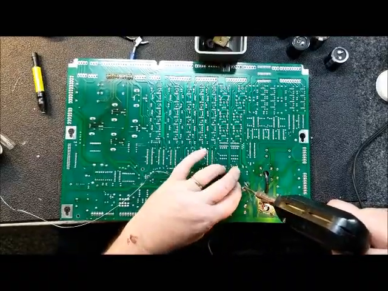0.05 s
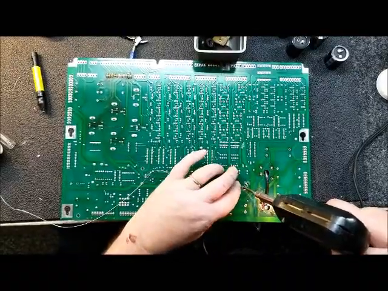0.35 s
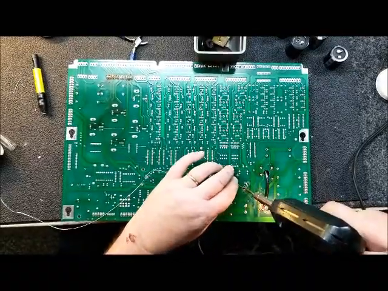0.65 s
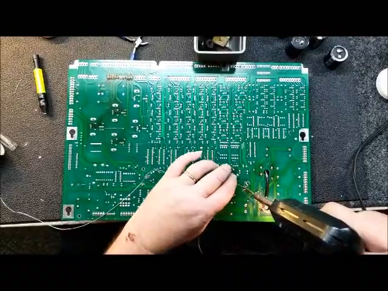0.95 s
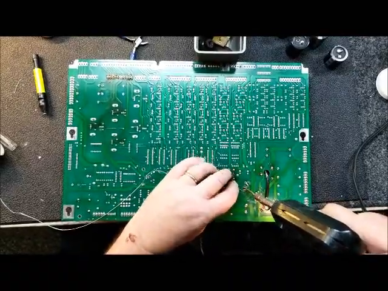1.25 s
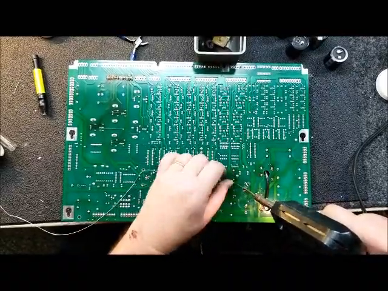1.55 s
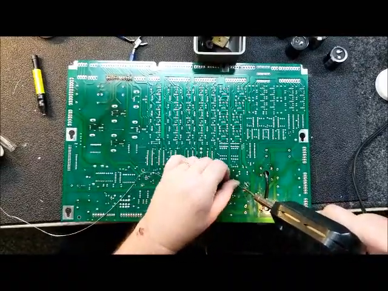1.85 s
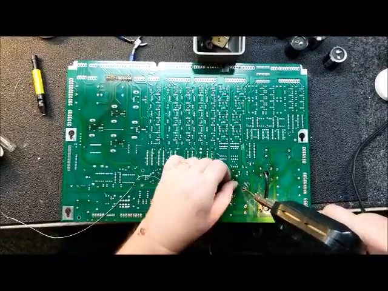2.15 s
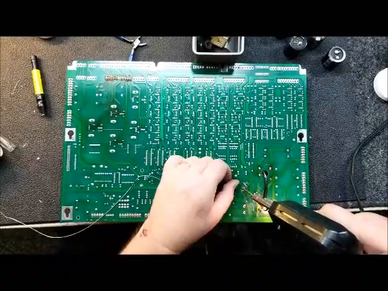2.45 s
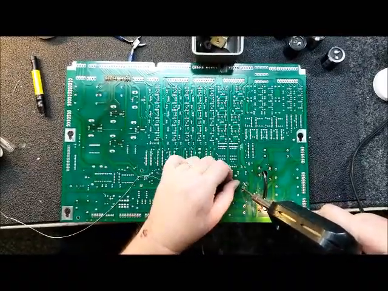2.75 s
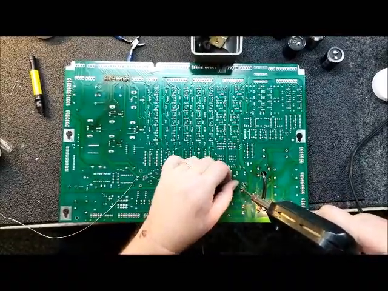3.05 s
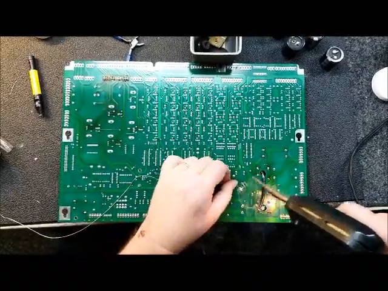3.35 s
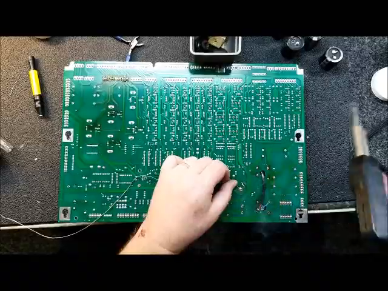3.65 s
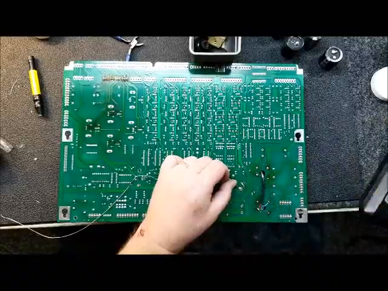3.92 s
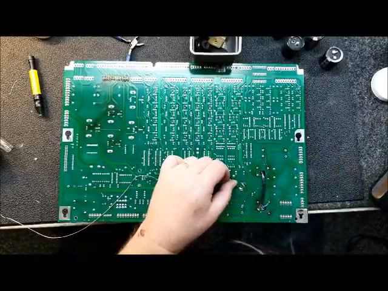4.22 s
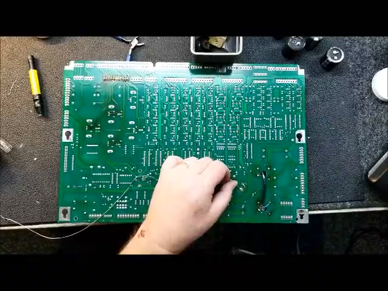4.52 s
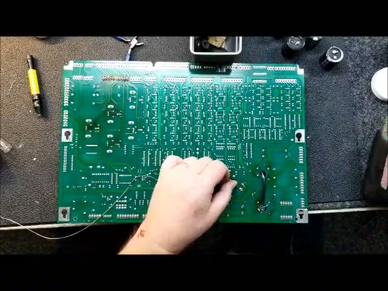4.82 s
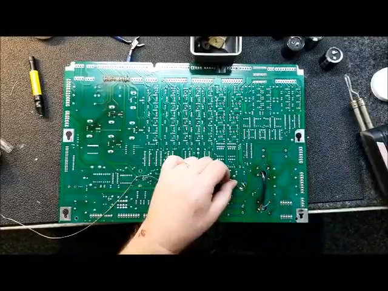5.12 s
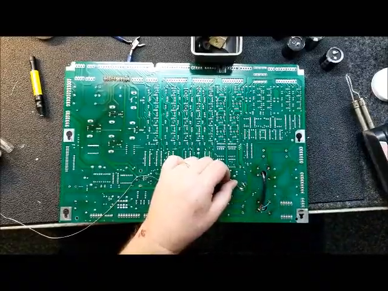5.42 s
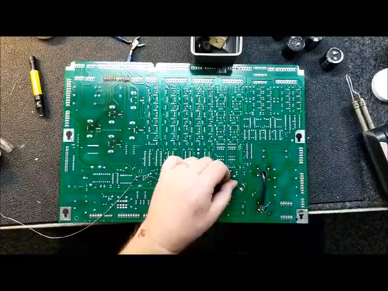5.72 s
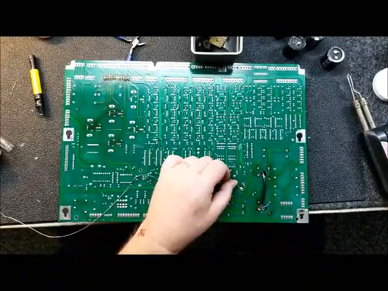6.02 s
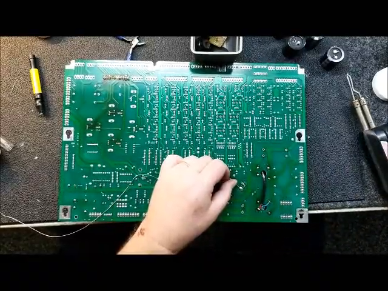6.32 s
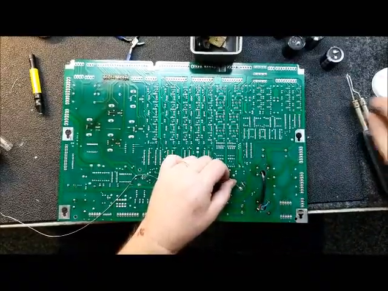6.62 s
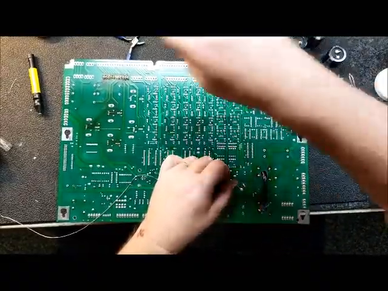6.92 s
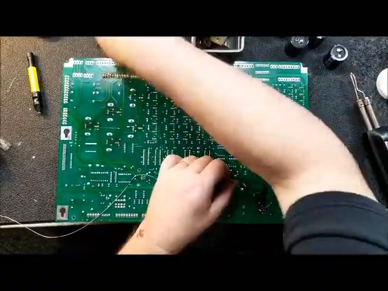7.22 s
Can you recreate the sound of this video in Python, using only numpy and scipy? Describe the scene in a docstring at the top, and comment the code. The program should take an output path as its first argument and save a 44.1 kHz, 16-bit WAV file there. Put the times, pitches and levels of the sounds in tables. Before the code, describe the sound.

An electric soldering gun buzzes and rattles on a circuit board, snaps off, then is set down with light knocks and scrapes.

```python
"""A rattling electric buzz, then a sharp snap and a few knocks and scrapes: a soldering gun at work.
Its transformer twitches twice per mains cycle, shaking the case and the tip as the grip shifts.
The circuit board ticks under the hand, the trigger snaps off, and the gun is laid on the bench.
Behind it all, a fan hums in a small workroom."""
import sys
import numpy as np
from scipy import signal
from scipy.fft import rfft, irfft, next_fast_len
from scipy.io import wavfile
from scipy.ndimage import uniform_filter1d, map_coordinates

SR = 44100
rng = np.random.default_rng(int(sys.argv[2]) if len(sys.argv) > 2 else 0)


def generate_wav(sig):
    """Save sig (samples, or channels by samples) to the path in sys.argv[1] as 16-bit PCM at SR."""
    pcm = np.round(np.clip(np.atleast_2d(sig).T, -1, 1) * 32767).astype(np.int16)
    wavfile.write(sys.argv[1], SR, pcm)


N = 329242
BUZZ_HZ, OFF_S = 120.04, 3.508  # twitches per second; when the trigger opens

# Levels in the tables are relative: the functions add their own gains.
# The tones of the transformer's core and of the plastic case.
# Each row: multiple of the buzz (rounded when played), level in dB, left minus right in dB.
CORE_TONES = [(6, -30.5, 1.5), (7, -23, 10), (8, -16, 2.5), (9, -16, -4), (10, -12.5, 3.5),
              (11, -11.5, 4.5), (12, -4.5, 3), (13, 1, 12), (14, -2.5, -2.5), (15, -16, -8.5)]
CASE_TONES = [(15.86, 2, -3.5), (17.3, -1, 4), (17.8, -5.5, 3), (19.39, -7.5, 4), (20, -18.5, 0.5),
              (20.6, -15.5, 7), (22.4, -14, 12.5)]
# How hard each part shakes as the grip shifts. Each row: time in seconds, level in dB.
CORE_LEVEL = [(0.02, -43.5), (0.27, -42.5), (0.77, -43), (0.79, -41), (2.05, -45), (2.07, -48.5),
              (2.48, -44.5), (2.53, -48), (2.74, -46), (3.16, -49.5), (3.44, -47.5), (3.48, -48)]
CASE_LEVEL = [(0, -59), (0.66, -61.5), (0.8, -56), (1.22, -56), (2.03, -60), (2.07, -61), (2.5, -59.5),
              (2.53, -57), (3.08, -57), (3.13, -51.5), (3.5, -54.5)]
TIP_LEVEL = [(0, -59.5), (0.74, -59), (0.77, -67.5), (0.88, -66.5), (1.6, -61.5), (2.08, -62.5),
             (2.63, -61), (2.7, -67), (3.25, -64.5), (3.29, -61)]
# The tone colour of each rattle. Each row: frequency in Hz, level in dB.
CORE_RATTLE = [(400, -19), (900, -11), (1550, 7), (2100, -17.5), (3000, -17.5), (5000, -27.5)]
CASE_RATTLE = [(1200, -13.5), (2000, 1.5), (2800, -8), (3200, -20), (6000, -30.5)]
FRAME_RATTLE = [(2500, -13), (2850, -6), (3180, -16), (3450, -4), (3750, -1), (4000, 0.5), (4300, -2.5),
                (4750, -1.5), (5200, -6), (5800, -12.5), (8000, -22.5)]
TIP_RATTLE = [(4500, -22), (5150, -10.5), (5650, -4), (6000, 2.5), (6400, 1.5), (6850, -1.5), (7400, 0),
              (8050, -11), (8600, -4.5), (9300, -23.5), (11000, -23.5), (12800, -11), (15500, -40)]
# The notes of the chattering tip. Each row: pitch in Hz, level in dB.
TIP_NOTES = [(5640, -4), (6270, 2.5), (6840, -3.5), (7380, -3), (7900, -13), (8650, -15.5)]
# Loose parts sing out. Each row: start and end in seconds, pitch in Hz, level in dB.
SINGING = [(0, 0.773, 5880, -67.5), (0, 0.77, 6100, -61.5), (0, 0.77, 7320, -65), (0.85, 2.66, 7470, -65),
           (1.11, 2.7, 3730, -67), (2.52, 3.517, 2316, -65.5), (3.14, 3.477, 2890, -60.5),
           (3.125, 3.517, 4230, -68.5), (3.27, 3.48, 6350, -62.5), (3.27, 3.52, 8330, -69)]

# The board ticks, the tip slips, the trigger springs back and the gun's body brushes something.
# Each row: start in seconds, level in dB.
TICKS = [(0.8255, -49.5), (1.7045, -31), (1.7263, -43), (1.7625, -38)]
SLIPS = [(0.288, -37), (0.298, -46), (0.326, -44.5), (0.338, -47), (2.003, -44), (2.214, -46.5),
         (2.92, -48), (3.106, -42), (3.122, -49.5)]
TRIGGER = [(3.51, -18)]
BRUSHES = [(3.96, -37.5)]
# The case knocks on tools and bench.
# Each row: start in seconds, level in dB, treble offset in dB, pitch in Hz.
KNOCKS = [(3.6077, -43, -6, 4500), (3.712, -55, -9, 2010), (3.8686, -48.5, -20, 2200),
          (3.9699, -38.5, -21, 2670), (3.997, -41, -23.5, 2650), (4.013, -46, -25.5, 2600),
          (4.0285, -45, -25, 2980), (4.0851, -43, -28, 3120), (4.1107, -47.5, -20, 3600),
          (4.4185, -42, -6, 1750), (4.844, -56, -5, 2700), (4.8973, -34, -16.5, 2740),
          (4.904, -36.5, -25, 2900), (4.926, -43, -21.5, 2360), (5.065, -38.5, -7.5, 3400),
          (5.108, -44.5, -21, 3000), (5.1481, -40.5, -11.5, 2720), (5.166, -37, -20, 2000)]
# Nudged things knock hollowly. Each row: start in seconds, level in dB, pitch in Hz.
CLONKS = [(3.958, -52, 710), (4.973, -44, 1050), (4.984, -47.5, 1060), (5.014, -48, 1060),
          (5.028, -46.5, 1070), (5.037, -47, 1090), (5.066, -46, 1180), (5.09, -52, 1180),
          (5.107, -53, 1190), (5.155, -47.5, 1260), (5.1646, -40.5, 1280), (5.212, -51, 1140),
          (5.244, -47.5, 1040), (7.442, -40.5, 690)]
# Bumps on the bench. Each row: start in seconds, level in dB, treble lift in dB per octave.
THUMPS = [(0.601, -59, -8), (1.631, -59, -8), (3.15, -55, -8), (4.423, -38.5, 1.5), (4.596, -53.5, -1),
          (5.145, -43.5, -9), (6.462, -49, 1.5), (7.394, -51, 1.5), (7.443, -48, -1)]
# Drags over the mat. Each row: start and end in seconds, level in dB, pitch in Hz.
SLIDES = [(3.74, 4.02, -59.5, 2180), (3.956, 4.142, -60.5, 766), (4.301, 4.363, -68.5, 2600),
          (4.372, 4.471, -59, 1480), (4.53, 4.643, -61, 2130), (4.599, 4.757, -62, 724),
          (4.723, 4.922, -67, 2240), (4.92, 5.162, -59, 2850), (5.277, 5.449, -74.5, 1000)]
# The tone colour of each sharp contact. Each row: frequency in Hz, level in dB.
TICK_TONE = [(150, -18), (440, -11.5), (590, 0.5), (800, -2.5), (1700, 0.5), (2350, 0.5), (3200, -3.5),
             (4250, 0.5), (5400, -7), (7000, -1), (9000, -5.5), (13000, -2.5), (16000, -10)]
SLIP_TONE = [(300, -14.5), (750, -4.5), (1050, -6), (1550, 8.5), (2400, -4.5), (3700, -10), (4500, -4.5),
             (5200, -17.5), (6800, -5.5), (9500, -19), (16000, -19.5)]
TRIGGER_TONE = [(400, -33.5), (560, -38), (850, -12.5), (1150, -17.5), (1950, 2), (2700, -1), (3400, -8),
                (4100, -13.5), (4800, -2), (5200, -11), (7100, -9.5), (8500, -13.5), (12800, -15.5),
                (16000, -23.5)]
KNOCK_TREBLE = [(3000, -30.5), (5500, 1.5), (8000, 3.5), (11000, -3), (16000, -3)]
# Tone colours that move with the pitch. Each row: multiple of the pitch, level in dB.
KNOCK_TONE = [(.05, -13.5), (.12, 0), (.2, -10.5), (.33, -2.5), (.55, -5.5), (.8, 1.5), (1.15, 1),
              (1.7, -7), (2.5, -12), (4.4, -30)]
CLONK_TONE = [(.2, -24), (.5, -17), (.72, -4.5), (.9, 1.5), (1.08, 0), (1.3, -10), (2, -26.5), (4, -33),
              (10, -56)]
SLIDE_TONE = [(.2, -14), (.6, -10), (.8, -2), (1.2, -2.5), (1.45, -9.5), (3, -14), (7, -25.5), (20, -29)]
# How each thing rings when struck. Each row: pitch in Hz, level in dB, seconds to fade by 60 dB.
BOARD_RING = [(560.6, -4.5, 0.44), (990, -4, 0.17), (2600, 6, 0.12), (3300, 3, .09), (4150, 0.5, .14),
              (7990, 1, .13)]
TIP_RING = [(1586, 9, 0.19), (4490, -4.5, 0.092), (4700, -18, 0.21), (6880, -5, 0.064)]
SPRING_RING = [(2020, 1, 0.13), (3210, 2, 0.041), (4840, 0, 0.037), (7100, -6.5, .09)]
BODY_RING = [(1220, -23.5, 0.22), (1415, 3, 0.036), (2650, -10, 0.06)]
BENCH_RING = [(72.2, 4, 0.18), (128.4, 5, 0.11), (187, -6.5, 0.16), (322, -4, 0.056)]

# The fan's tones, and the colours of the air and a thin hiss. Each row: frequency in Hz, level in dB.
FAN_HUM = [(96.9, -73), (120.04, -72), (177.6, -79), (240.08, -63), (360.1, -79), (720.2, -92),
           (960.3, -91)]
AIR_TONE = [(25, -16.5), (60, -7.5), (90, -2), (140, -8), (200, -12.5), (380, -16), (600, -24),
            (1300, -30.5), (2200, -28), (3200, -33.5), (8200, -32.5), (9500, -37.5), (13000, -31.5),
            (15800, -33.5)]
HISS_TONE = [(5500, -34), (6900, -14.5), (7450, -5), (8000, -14.5), (9000, -23)]
# How alike the air is on the left and right. Each row: frequency in Hz, likeness from 0 to 1.
AIR_LIKENESS = [(100, 0.56), (400, 0.61), (1500, 0.082), (5000, 0.044)]
# The microphone's two openings ring differently. Each row: frequency in Hz, left minus right in dB.
PORT_BALANCE = [(6400, 1), (7300, 3.5), (7900, 2.5), (8800, -9), (9800, 0), (11000, -6), (13000, -0.5)]
# The buzz reaches them by different paths. Each row: frequency in Hz, the left's lead in radians.
PORT_LEAD = [(960, 0.5), (1200, 0.5), (1320, -2.5), (1440, 0.4), (1560, -1.63), (1680, -1.16),
             (1800, -1.53), (2600, -1.7)]


def buzzing_gun():
    """The transformer shakes the case, frame and tip; the buzz dies away when the trigger opens."""
    core_db, case_db, tip_db = (level_curve(rows) for rows in (CORE_LEVEL, CASE_LEVEL, TIP_LEVEL))
    # dB above each part's average while the gun is on
    core_rise, case_rise, tip_rise = (db - db[:round(OFF_S * SR)].mean()
                                      for db in (core_db, case_db, tip_db))
    # a quieter core sounds duller
    sound = amp(core_db + 0.68) * twitches(CORE_TONES, 0.13 * core_rise, waver_db=0.96, lag=-0.038)
    sound += amp(core_db - 16) * rattle(CORE_RATTLE, scatter_db=6.5, rough=3.2, lag=0.28, pan_db=6)
    # the case gets brighter as it shakes harder and as the core weakens
    case_tilt_db = 0.22 * case_rise - 0.12 * core_rise
    sound += amp(case_db + 2.5) * twitches(CASE_TONES, case_tilt_db, waver_db=3, lag=-0.022, smear=0.3)
    sound += amp(case_db - 3.5) * rattle(CASE_RATTLE, scatter_db=1, rough=4.3, lag=0.4, pan_db=4.5)
    # tip and case shake the frame, which also takes up what the core loses
    frame_db = -60.5 + 0.87 * tip_rise - 0.7 * core_rise + 0.49 * case_rise
    sound += amp(frame_db) * rattle(FRAME_RATTLE, scatter_db=-1, rough=0.57, lag=0.25, pan_db=1)
    tip = rattle(TIP_RATTLE, scatter_db=0, rough=0.8, lag=0.4, pan_db=1.4, ring_s=0.05)
    sound += amp(tip_db + 2.5) * tip
    # chatter on the joint rings the tip; a rattling case damps it
    chatter = strikes(scatter_db=1.2, lag=0.45)
    ring = sum(amp(db + 2.5 * wobble(6.3)) * resonance(chatter, hz, width_hz=120) for hz, db in TIP_NOTES)
    ring_db = -71.5 + 0.35 * tip_rise - 0.3 * case_rise
    sound += amp(ring_db) * stereo(ring, pan_db=-0.8, delay_samples=1)
    since_off = np.maximum(np.arange(N) / SR - OFF_S, 0)
    return sound * fade(since_off, 0.1)


def twitches(tones, tilt_db, waver_db, lag, smear=0):
    """Tones add up to one pulse per twitch; tilt_db lifts each higher multiple, lag is in cycles."""
    cycle = np.arange(N) * BUZZ_HZ / SR - lag
    wave, power, sides = 0, 0, np.array([[0.5], [-0.5]])
    for multiple, db, pan_db in tones:
        step = multiple - tones[0][0]
        size = amp(db + tilt_db * step + waver_db * wobble(11))
        late = smear * step ** 2 / (2 * len(tones))  # higher tones arrive later
        harmonic = round(multiple)
        phase = 2 * np.pi * (harmonic * cycle - late) + sides * value_at(PORT_LEAD, harmonic * BUZZ_HZ)
        wave += size * unit(amp(sides * pan_db)) * np.cos(phase)
        power += size ** 2 / 2
    return wave / np.sqrt(power)


def rattle(tone, scatter_db, rough, lag, pan_db, ring_s=0.1117):
    """A loose part strikes on every twitch, with some grit; its ring shifts as the hand moves."""
    t = np.arange(SR // 10) / SR
    paths = rng.standard_normal((2, 2, len(t))) * fade(t, ring_s)  # two grips, two sides
    paths[:, 0] += stereo(paths[0, 1], pan_db=0, delay_samples=5)[0]  # the sides share some ring
    # short paths smear each strike in time but colour it only mildly
    response = rfft(paths)
    paths = irfft(response / np.sqrt(np.abs(response)), len(t))
    one, other = signal.fftconvolve(strikes(scatter_db, lag)[None, None], paths, axes=2)[..., :N]
    grip = 1.17 * wobble(1.44)
    ring = unit(one * np.cos(grip) + other * np.sin(grip))
    since_strike = (np.arange(N) * BUZZ_HZ / SR - lag - 0.5) % 1  # in cycles
    grit = unit(rng.standard_normal((2, N)) * np.exp(-since_strike))
    sound = coloured(ring + rough * grit, tone)
    return np.array([unit(side) for side in sound]) * pan(pan_db)


def strikes(scatter_db, lag):
    """One sharp hit per buzz cycle, shifted by lag cycles; scatter_db makes the hits uneven."""
    cycle = np.arange(N) * BUZZ_HZ / SR - lag + 2
    offset = (cycle % 1 - 0.5) * SR / BUZZ_HZ  # samples from the hit
    sizes = amp(scatter_db * rng.standard_normal(int(N * BUZZ_HZ / SR) + 5))
    return sizes[cycle.astype(int)] * np.sinc(offset) * np.exp(-(offset / 8) ** 2)


def singing_parts(waver_db=0.95, swell_s=0.022):
    """Loose parts, struck on every twitch, each sing one note for as long as the grip holds."""
    out, t = np.zeros(N), np.arange(N) / SR
    chatter = strikes(scatter_db=1.7, lag=0.48)
    for start, end, hz, db in SINGING:
        hold = np.clip(np.minimum(t - start, end - t) / swell_s, 0, 1)
        out += resonance(chatter, hz, width_hz=110) * hold * amp(db + waver_db * wobble(7.3))
    return stereo(out, pan_db=2.4, delay_samples=1)


def clicks():
    """Ticks, slips and the trigger's snap: each is a crack plus the ring of board, tip or spring."""
    out = np.zeros((2, N))
    hardest = max(db for start, db in TICKS)
    for start, db in TICKS:
        dulling_db = 0.43 * (hardest - db)  # a lighter touch loses its treble
        tone = [(hz, level - dulling_db * min(hz / 10000, 1)) for hz, level in TICK_TONE]
        crack = contact(tone, fade_s=0.023, bench_db=6.5, room_db=-5, pan_db=1, room_s=0.4)
        add(out, start, amp(db - 3) * (crack + amp(-9) * ringing(BOARD_RING)))
    for start, db in SLIPS:
        scratch = contact(SLIP_TONE, fade_s=0.022, bench_db=-1, room_db=-11, pan_db=0.5)
        add(out, start, amp(db - 2) * (scratch + amp(-4.5) * ringing(TIP_RING)))
    for start, db in TRIGGER:
        snap = contact(TRIGGER_TONE, fade_s=0.007, bench_db=-7.5, room_db=-25, pan_db=-0.5, bench_s=0.056)
        add(out, start, amp(db) * (snap + amp(-7) * ringing(SPRING_RING)))
    return out


def case_knocks():
    """The plastic case hits tools and bench: a bright click on top of a pitched knock."""
    out = np.zeros((2, N))
    for start, db, treble_db, hz in KNOCKS:
        click = contact(KNOCK_TREBLE, fade_s=0.013, bench_db=-9, room_db=-20, pan_db=0)
        knock = contact(pitched(KNOCK_TONE, hz), fade_s=0.0087,
                        bench_db=-6, room_db=-15, pan_db=-0.5, bench_s=0.064)
        add(out, start, amp(db + treble_db + 1.5) * click + amp(db - 6.5) * knock)
    return out


def settling(bounce_s=0.05, bounce_loss_db=7.5):
    """Nudged things clonk, the brushed gun rings, and gun, hand and arm make the bench boom."""
    out = np.zeros((2, N))
    for start, db, hz in CLONKS:
        clonk = contact(pitched(CLONK_TONE, hz), fade_s=0.025,
                        bench_db=-11.5, room_db=-18, pan_db=0.5, bench_s=0.13)
        add(out, start, amp(db) * clonk)
    for start, db in BRUSHES:
        add(out, start, amp(db) * ringing(BODY_RING, attack_s=0.0077))
    for start, db, tilt_db in THUMPS:
        boom = -ringing(BENCH_RING, tilt_db, attack_s=0.0023)
        add(out, start, amp(db) * boom)
        add(out, start + bounce_s, amp(db - bounce_loss_db) * boom)  # the weight settles
    return out


def sliding(grain_db=2):
    """The cord and the case drag over the mat in small catches."""
    out = np.zeros((2, N))
    for start, end, db, hz in SLIDES:
        n = max(round((end - start) * SR), SR // 50)
        catches = rng.standard_normal((2, n)) * amp(grain_db * wobble(129)[:n])
        rub = unit(coloured(catches, pitched(SLIDE_TONE, hz)))
        add(out, start, amp(db) * rub * signal.windows.tukey(n, 0.5))
    return out


def contact(tone, fade_s, bench_db, room_db, pan_db, bench_s=0.11, room_s=0.41):
    """One hit: a short crack of noise, quick echoes off the bench, then the room's longer tail."""
    t = np.arange(SR // 2) / SR
    crack = stereo(rng.standard_normal(len(t)) * fade(t, fade_s), pan_db=0, delay_samples=8)
    tail = amp(bench_db) * fade(t, bench_s) + amp(room_db) * fade(t, room_s)
    echoes = rng.standard_normal((2, len(t))) * tail * (1 - np.exp(-t / 0.0014))
    return unit_peak(coloured(crack + echoes, tone)) * pan(pan_db)


def ringing(notes, tilt_db=0, attack_s=0.00083):
    """A struck thing rings with a few fading notes; tilt_db lifts each higher octave."""
    t = np.arange(SR // 2) / SR
    ring = sum(amp(db + tilt_db * np.log2(hz)) * fade(t, fade_s) * np.sin(2 * np.pi * hz * t)
               for hz, db, fade_s in notes)
    onset = 1 - np.exp(-t / attack_s)
    return unit_peak(stereo(ring * onset, pan_db=0.71, delay_samples=10))


def fan_and_air():
    """A fan's wavering hum, steady air, and a thin hiss mostly on the left."""
    t, hz = np.arange(N) / SR, np.fft.rfftfreq(N, 1 / SR)
    hum = sum(amp(db + 1.5 * wobble(3.63)) * np.sqrt(2) * np.sin(2 * np.pi * (pitch * t + rng.random()))
              for pitch, db in FAN_HUM)
    # the two sides are alike in the bass and drift apart in the treble
    spread = np.arccos(value_at(AIR_LIKENESS, hz)) / 2
    spectrum = rfft(rng.standard_normal((2, N))) * amp(value_at(AIR_TONE, hz))
    mid, side = irfft(spectrum * [np.cos(spread), np.sin(spread)], N)
    air = unit(np.array([mid + side, mid - side])) * amp([[-63.33], [-64.7]])
    hiss = amp(-83) * unit(coloured(rng.standard_normal(N), HISS_TONE))
    return stereo(hum, pan_db=1.8, delay_samples=6) + air + stereo(hiss, pan_db=16.7, delay_samples=0)


def microphone_ports(x):
    """Close sounds take on the colour of the microphone's left and right openings."""
    return np.array([coloured(side, [(hz, sign * db / 2) for hz, db in PORT_BALANCE])
                     for side, sign in zip(x, (1, -1))])


def resonance(x, hz, width_hz):
    """Keep one narrow band of x, at a standard level."""
    return unit(signal.lfilter(*signal.iirpeak(hz, hz / width_hz, fs=SR), x))


def coloured(x, tone):
    """Give x a tone colour, with a filter that rings only after a hit (minimum phase)."""
    n = x.shape[-1]
    half = next_fast_len(n // 2 + SR // 20)
    size = 2 * half
    cepstrum = irfft(np.log(amp(value_at(tone, np.fft.rfftfreq(size, 1 / SR)))))
    cepstrum[1:half] *= 2  # move the early half of the response after the hit
    cepstrum[half + 1:] = 0
    return irfft(rfft(x, size) * np.exp(rfft(cepstrum)), size)[..., :n]


def pitched(tone, hz):
    """Move a tone colour given in multiples to a pitch."""
    return [(hz * multiple, db) for multiple, db in tone]


def value_at(rows, hz):
    """Read between a table's rows on a musical (log) frequency scale."""
    frequencies, values = np.transpose(rows)
    return np.interp(np.log(hz + 1), np.log(frequencies + 1), values)


def level_curve(rows):
    """Join timed levels with straight lines, one value per sample."""
    return np.interp(np.arange(N) / SR, *np.transpose(rows))


def wobble(rate):
    """A smooth curve through rate random points a second."""
    return map_coordinates(rng.standard_normal(int(N * rate / SR) + 4), [np.arange(N) * rate / SR])


def fade(t, fade_s):
    """Die away by 60 dB every fade_s seconds."""
    return amp(-60 * t / fade_s)


def amp(db):
    """Turn decibels into a gain."""
    return 10 ** (np.asarray(db) / 20)


def unit(x):
    """Scale to an average (rms) level of 1."""
    return x / np.sqrt(np.mean(x ** 2) + 1e-20)


def unit_peak(x):
    """Scale so that the loudest 4 milliseconds have a level of 1."""
    return x / np.sqrt(uniform_filter1d(np.mean(x ** 2, axis=0), 176).max())


def pan(pan_db):
    """Two gains that make the left pan_db louder than the right."""
    return amp([[pan_db / 2], [-pan_db / 2]])


def stereo(x, pan_db, delay_samples):
    """Spread one channel over two, delaying the left."""
    return np.array([np.pad(x, (delay_samples, 0))[:len(x)], x]) * pan(pan_db)


def add(track, start, sound):
    """Mix a sound in at start seconds."""
    part = track[:, round(start * SR):][:, :sound.shape[1]]
    part += sound[:, :part.shape[1]]


def scene():
    """Everything on the bench, with the room behind it."""
    close = buzzing_gun() + singing_parts() + clicks() + case_knocks() + sliding()
    return microphone_ports(close) + settling() + fan_and_air()


def record(dry):
    """Cut away the very highest treble."""
    size, top_hz = next_fast_len(N + SR // 2), 15850
    kept = np.fft.rfftfreq(size, 1 / SR) < top_hz
    return irfft(rfft(dry, size) * kept, size)[:, :N]


dry = scene()
out = record(dry)
generate_wav(out)
```